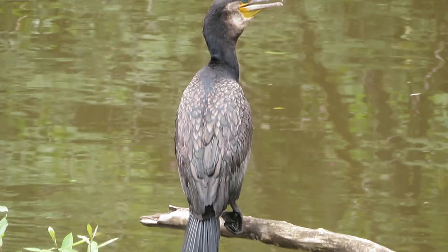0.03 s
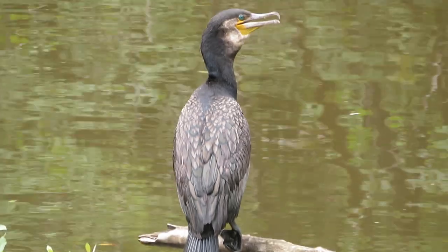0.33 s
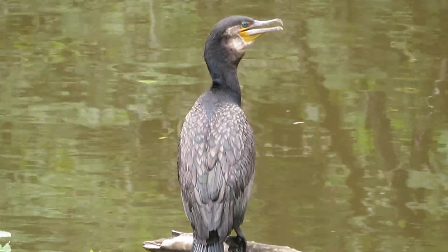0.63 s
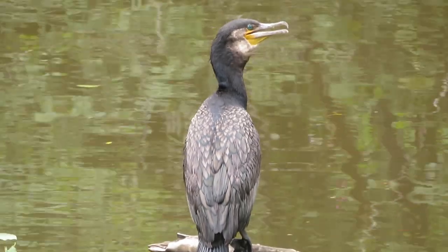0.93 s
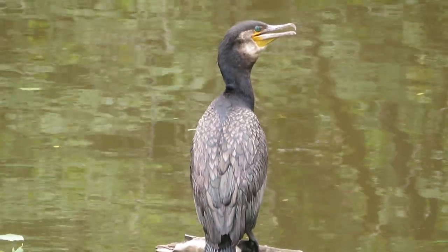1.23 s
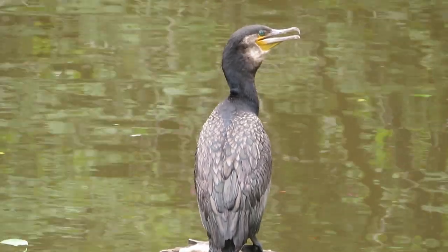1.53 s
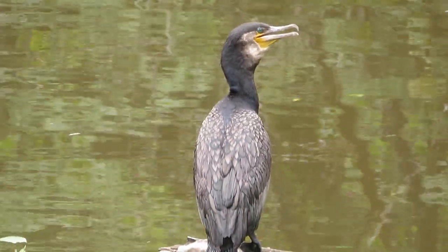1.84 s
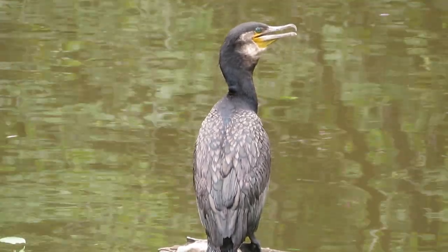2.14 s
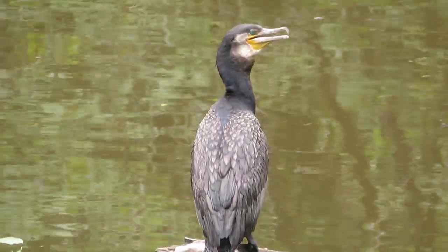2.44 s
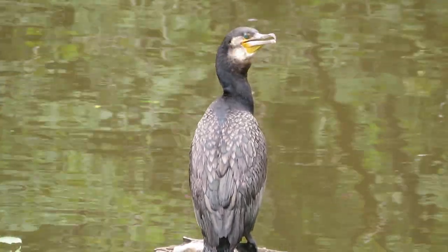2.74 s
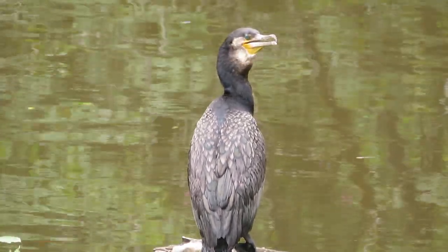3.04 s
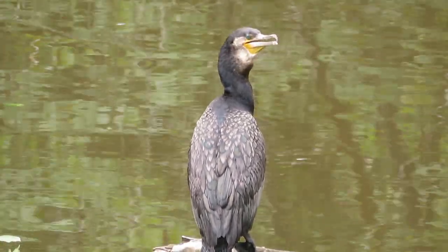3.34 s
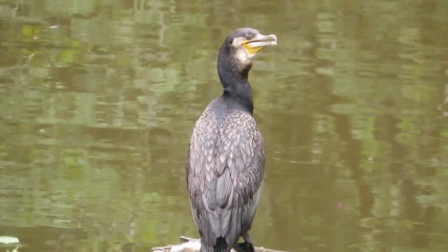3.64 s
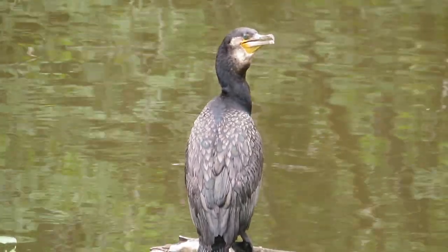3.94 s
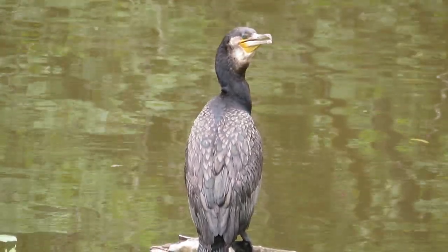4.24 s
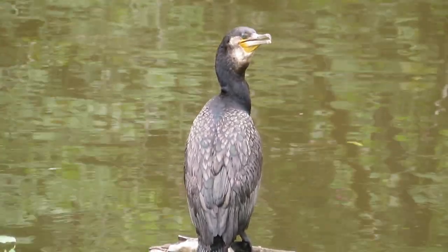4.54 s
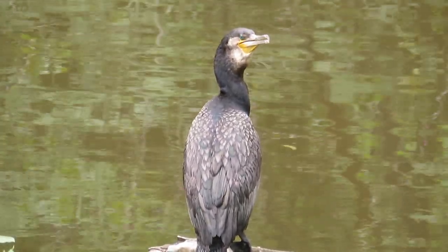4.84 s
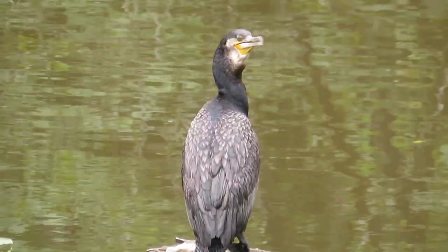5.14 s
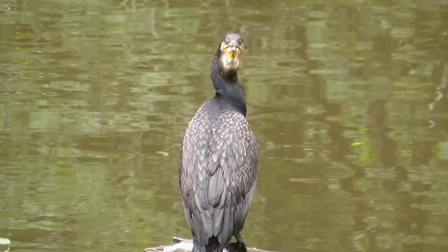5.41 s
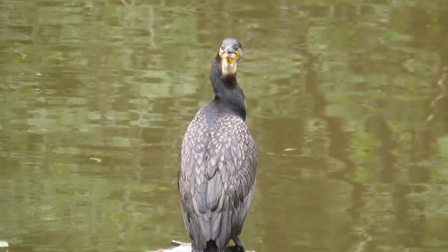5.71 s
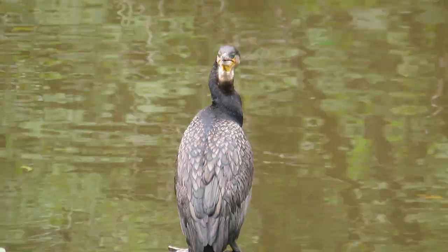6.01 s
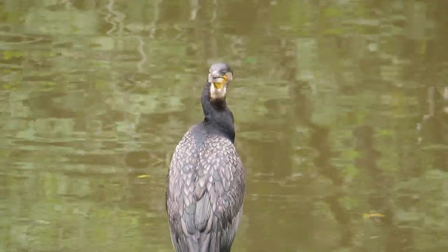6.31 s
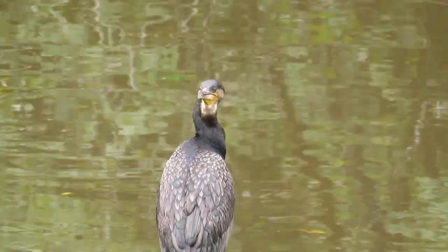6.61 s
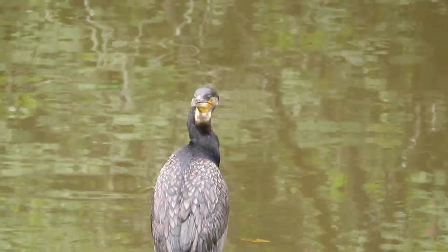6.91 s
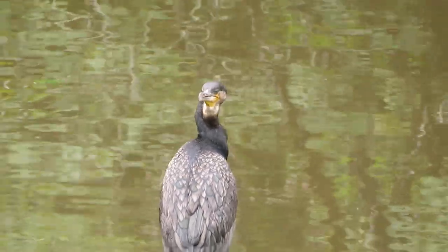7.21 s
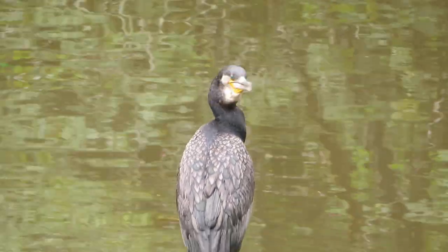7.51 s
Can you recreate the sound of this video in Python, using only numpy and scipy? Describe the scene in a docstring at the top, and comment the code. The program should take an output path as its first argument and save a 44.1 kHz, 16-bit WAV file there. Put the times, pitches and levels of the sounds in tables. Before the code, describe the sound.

Distant road traffic, heard outdoors from a riverbank, fades in over the first 2.7 seconds with a deep rumble and smooth tyre roar, ahead and slightly to the right. From the start a heavy vehicle draws away with a thin, slowly rising whine that lasts until about 6.5 seconds. Its exhaust growls harder from about 1 to 3 seconds, then eases. A group of cars passes around 2 to 4 seconds. Wheels thud dully over bumps, once near 1 second and often from 3 seconds on. Near 4 seconds one car's tyres sing, dipping slightly in pitch and fading slowly. At about 4.6 seconds air hisses out once, as from a brake, dying away within a second. At about 7.4 seconds a small, far bird gives one very faint, high peep while the rumble continues to the end.

```python
"""Road traffic, heard from a riverbank some way off, fades in with rumbling engines and roaring tyres.
From the start a heavy vehicle draws away with a thin, slowly rising whine; after a second it pulls harder.
A group of cars passes, and from about 3 s wheels often thud over bumps. Near 4 s one car's tyres sing.
Then air hisses out once, probably from a brake, and just before the end a small, far bird peeps."""
import sys
import numpy as np
from scipy import signal
from scipy.fft import rfft, irfft, next_fast_len
from scipy.io import wavfile

SR = 44100
rng = np.random.default_rng(int(sys.argv[2]) if len(sys.argv) > 2 else 0)


def transcribe(signal):
    """Save signal, clipped to [-1, 1], as a 16-bit WAV file at the path in sys.argv[1]."""
    frames = np.atleast_2d(signal).T
    limited = np.clip(frames, -1, 1)
    pcm = np.round(limited * 32767).astype(np.int16)
    wavfile.write(sys.argv[1], SR, pcm)


N = 342216
TIME = np.arange(N) / SR
SIZE = next_fast_len(N)
FREQS = np.maximum(np.arange(SIZE // 2 + 1) * SR / SIZE, 1)
CARS_NEAREST_S, CARS_PASS_S = 2.34, 1.58


# How strong the tyre roar is, from low to high: (frequency [Hz], level [dB per Hz])
TYRE_SPECTRUM = [(150, -77.5), (380, -65), (480, -63.5), (650, -61.5), (760, -62.5), (900, -61),
                 (1020, -65), (1350, -72.5), (1900, -76), (2800, -86), (4500, -99), (9000, -125.4)]
# Brief swells of the roar as single vehicles come by: (time [s], level [dB])
TYRE_SWELLS = [(2.9, -2), (3.15, -6), (3.42, -3), (3.91, -3.5), (7.62, -9)]

def tyre_roar():
    """Tyres roar on the road: a steady stream, a passing group of cars and a few single vehicles."""
    nearness, _ = passing(CARS_NEAREST_S, CARS_PASS_S)
    stream, group = from_db(-4), from_db(0.3) * nearness
    singles = swells(TYRE_SWELLS, width_s=0.08)
    gain = np.sqrt(stream ** 2 + group ** 2 + singles ** 2)  # separate noises add by their power
    return to_right(far_roar(TYRE_SPECTRUM, gain, waver_db=0.5, waver_hz=34), right_db=1.1)


# The deep rumble of all the traffic: (frequency [Hz], level [dB per Hz])
RUMBLE_SPECTRUM = [(20, -72), (30, -64.5), (40, -54.5), (65, -55), (105, -56), (165, -57), (210, -61.5),
                   (290, -62), (400, -69.5), (700, -84.5)]

def traffic_rumble():
    """A deep rumble, boosted at the start so it fades in sooner, then growing a little as cars come by."""
    nearness, _ = passing(CARS_NEAREST_S, CARS_PASS_S)
    opening_boost_db = 10.5 * np.exp(-TIME / 0.51)
    level_db = -1.0 + opening_boost_db + 1.23 * nearness
    return far_roar(RUMBLE_SPECTRUM, from_db(level_db), waver_db=0.13, waver_hz=22)


# The noise of the heavy vehicle on the move: (frequency [Hz], level [dB per Hz])
RUNNING_SPECTRUM = [(200, -72), (370, -76), (450, -64.5), (550, -62.5), (680, -61), (1000, -64),
                    (1170, -66.5), (1270, -73.5), (1650, -70.5), (2250, -73), (2700, -79.5), (3300, -82.5),
                    (4200, -89), (5000, -93), (9000, -104.3)]

def truck_running():
    """The heavy vehicle's running noise sinks steadily as it draws away."""
    start_db, fall_db_per_s = 3.0, 3
    nearness = from_db(start_db - fall_db_per_s * TIME)
    return to_right(far_roar(RUNNING_SPECTRUM, nearness, waver_db=0.9, waver_hz=15), right_db=1.5)


# The low growl of its exhaust: (frequency [Hz], level [dB per Hz])
EXHAUST_SPECTRUM = [(70, -59.5), (90, -53.5), (115, -64.5), (150, -55), (180, -58), (245, -57.5),
                    (310, -78.5)]

def truck_exhaust():
    """The exhaust grows louder as the engine pulls, then quieter as it eases off."""
    load = from_db(0.5) * rise_hold_fall(1.23, 3.06, rise_db_per_s=10, fall_db_per_s=4.5)
    return far_roar(EXHAUST_SPECTRUM, load, waver_db=1.5, waver_hz=11)


# Moments when its engine drone swells: (time [s], level [dB])
ENGINE_SWELLS = [(1.5, -37), (2.0, -39.5), (2.8, -39.5)]

def truck_drone():
    """The engine drones higher as the vehicle gathers speed."""
    start_hz, climb_hz_per_s = 408.7, 17.5
    hz = start_hz + climb_hz_per_s * TIME
    return narrow_band(hz, swells(ENGINE_SWELLS, width_s=0.19), width_hz=54)


# Moments when its gear whine comes through: (time [s], level [dB])
GEAR_SWELLS = [(0.2, -44), (1.0, -50), (1.9, -50), (2.9, -52.5), (4.2, -53), (4.65, -53.5), (6.3, -55)]

def truck_whine():
    """The gears whine, climbing ever more slowly as the vehicle nears top speed."""
    start_hz, top_hz, gather_s = 1138, 1198, 5.0
    hz = top_hz - (top_hz - start_hz) * np.exp(-TIME / gather_s)
    whine = tone(hz, swells(GEAR_SWELLS, width_s=0.41), wobble_hz=4.92, flutter_db=2.5)
    return to_right(whine, right_db=1.5)


# Wheels hitting bumps: (time [s], pitch [Hz], level [dB], time to fade by 60 dB [s])
WHEEL_THUDS = [(1.055, 82, -14, .12), (3.065, 92, -23, .2), (3.409, 108, -22, .13), (3.5, 105, -25, .12),
               (3.552, 170, -19, .12), (3.998, 160, -20, .1), (4.248, 143, -15.5, .12),
               (4.383, 143, -20, .13), (4.586, 155, -15.5, .11), (4.755, 170, -21.5, .12),
               (5.333, 172, -18.5, .15), (5.469, 135, -19.5, .11), (6.38, 110, -25, .17),
               (6.999, 67, -20, .22), (7.375, 116, -25, .15)]

def wheel_thuds(rise_s=0.006, pitch_blur=0.06):
    """Each bump makes a vehicle's body boom; arriving by many paths softens its start and blurs its pitch."""
    thuds = np.zeros(N)
    for at_s, hz, level_db, fade_s in WHEEL_THUDS:
        age = np.maximum(TIME - at_s, 0)
        shape = (1 - np.exp(-age / rise_s)) * from_db(-60 * age / fade_s)
        phase = 2 * np.pi * np.cumsum(hz * (1 + pitch_blur * drift(40.2))) / SR
        thuds += from_db(level_db) * shape * np.sin(phase)
    return thuds


def tread_song(nearest_s=3.8, middle_hz=859.5, shift_hz=26):
    """One car's tyre tread sings, dropping in pitch as it passes; a steadier ring emerges as it leaves."""
    _, away = passing(nearest_s, pass_s=0.9)
    hz = middle_hz - shift_hz * away
    gain = from_db(-39.5) * rise_hold_fall(nearest_s, nearest_s, rise_db_per_s=21, fall_db_per_s=1.8)
    ring = tone(hz, gain * from_db(-7) * np.maximum(away, 0), wobble_hz=7.06, flutter_db=1)
    return to_right(narrow_band(hz, gain, width_hz=103) + ring, right_db=3.0)


# The hiss of escaping air: (frequency [Hz], level [dB per Hz])
AIR_SPECTRUM = [(1200, -86), (2200, -79), (2850, -81), (3150, -80.5), (4200, -86.5), (4450, -88.5),
                (5500, -89), (6100, -92.5), (7500, -95.5), (10000, -106.3), (14000, -120.5)]

def air_release():
    """A valve opens and air rushes out, then the pressure dies away."""
    flow = rise_hold_fall(4.635, 4.83, rise_db_per_s=95, fall_db_per_s=26)
    return outdoor_noise(AIR_SPECTRUM) * flow


def bird_peep():
    """A small, far bird gives one short, high note."""
    gain = from_db(-66) * swell(at_s=7.358, width_s=0.024)
    return tone(hz=4630, gain=gain, wobble_hz=35, flutter_db=-1.0)


# How alike left and right are, where 1 means the same: (frequency [Hz], likeness [0 to 1])
EAR_LIKENESS = [(40, .99999), (90, .9997), (180, .992), (380, .955), (700, 1), (1300, .92), (2000, .91),
                (3000, .83), (4500, .76), (6000, .27), (8000, .03)]

def outdoor_noise(spectrum):
    """Noise from all around: low sounds are alike on both sides, high ones much less so."""
    return stereo_noise(spectrum, alike=at_hz(EAR_LIKENESS))


def far_roar(spectrum, gain, waver_db, waver_hz):
    """Distance smears a source into smooth noise; moving air makes its level waver."""
    return outdoor_noise(spectrum) * gain * from_db(waver_db * drift(waver_hz))


def stereo_noise(spectrum, alike, edge_db_per_octave=24):
    """Left and right noise shaped by a table, dying away beyond its lowest and highest frequency."""
    octaves_outside = np.abs(np.log2(FREQS / np.clip(FREQS, spectrum[0][0], spectrum[-1][0])))
    gain = from_db(at_hz(spectrum) - edge_db_per_octave * octaves_outside) * np.sqrt(SR / 2)
    shared, opposite = rfft(rng.standard_normal((2, SIZE)))
    pair = np.sqrt((1 + alike) / 2) * shared + np.sqrt((1 - alike) / 2) * opposite * [[1], [-1]]
    return irfft(gain * pair, SIZE)[:, :N]


def narrow_band(hz, gain, width_hz):
    """Many paths scatter a tone into restless noise close to its pitch."""
    phase = 2 * np.pi * np.cumsum(hz) / SR
    return gain * (drift(width_hz) * np.cos(phase) + drift(width_hz) * np.sin(phase))


def tone(hz, gain, wobble_hz, flutter_db):
    """One tone, fluttering on its way across the water."""
    phase = 2 * np.pi * np.cumsum(hz + wobble_hz * drift(16.0)) / SR
    return np.sqrt(2) * np.sin(phase) * gain * from_db(flutter_db * drift(5.2))


def passing(nearest_s, pass_s):
    """A straight drive past: nearness (1 at the closest point) and speed away from us (-1 to 1)."""
    along = (TIME - nearest_s) / pass_s  # in pass_s the car drives as far as the road is from us
    distance = np.hypot(1, along)
    return 1 / distance, along / distance


def swell(at_s, width_s):
    """A rounded rise and fall of height 1."""
    return np.exp(-.5 * ((TIME - at_s) / width_s) ** 2)


def swells(rows, width_s):
    """The strength of a sound that comes in several waves."""
    return sum(from_db(level_db) * swell(at_s, width_s) for at_s, level_db in rows)


def rise_hold_fall(from_s, to_s, rise_db_per_s, fall_db_per_s):
    """A strength that climbs to 1, holds between two times and dies away."""
    early_s, late_s = np.maximum(from_s - TIME, 0), np.maximum(TIME - to_s, 0)
    return from_db(-rise_db_per_s * early_s - fall_db_per_s * late_s)


def drift(rate_hz):
    """A random wander, mostly between -1 and 1, that changes about rate_hz times a second."""
    slow_hz = FREQS[:N // 128]
    noise = rfft(rng.standard_normal(2 * len(slow_hz) - 2))
    slow = irfft(noise / (1 + (slow_hz / rate_hz) ** 2) ** 2)
    slow = (slow - slow.mean()) / slow.std()
    return np.interp(np.arange(N) * len(slow) / SIZE, np.arange(len(slow)), slow)


def to_right(sound, right_db):
    """Lean a sound to the right by making that side louder."""
    return sound * from_db([[-right_db / 2], [right_db / 2]])


def at_hz(points):
    """Fill in a table's values at every frequency."""
    hz, values = np.transpose(points)
    return np.interp(np.log(FREQS), np.log(hz), values)


def from_db(db):
    """Turn decibels into a gain, the number a sound is multiplied by."""
    return 10 ** (np.asarray(db) / 20)


def scene():
    """The road lies ahead and a little to the right."""
    traffic = traffic_rumble() + wheel_thuds() + tyre_roar() + tread_song()
    truck = truck_exhaust() + truck_drone() + truck_running() + truck_whine()
    return traffic + truck + air_release() + bird_peep()


# The faint hiss of each microphone: (frequency [Hz], level [dB per Hz])
MICROPHONE_HISS = [(2000, -91.5), (5000, -95.5), (8000, -102.6), (11000, -107), (12500, -109.3),
                   (15000, -114.5)]

def record(dry):
    """Each microphone adds its own hiss; the sound fades in and the highest treble is cut."""
    fade_end_s, fade_db_per_s, overall_db = 2.753, 9.5, -0.29
    start_s, edge_s, cutoff_hz = 0.038, 0.0044, 15300
    fade_db = -fade_db_per_s * np.maximum(fade_end_s - TIME, 0)
    soft_ends = np.clip(np.minimum(TIME - start_s, TIME[-1] - TIME) / edge_s, 0, 1)
    hiss = stereo_noise(MICROPHONE_HISS, alike=0.0)
    faded = (dry + hiss) * from_db(fade_db + overall_db) * soft_ends
    treble_cut = signal.ellip(10, .1, 80, cutoff_hz, fs=SR, output="sos")
    return signal.sosfilt(treble_cut, faded)


dry = scene()
out = record(dry)
transcribe(out)
```